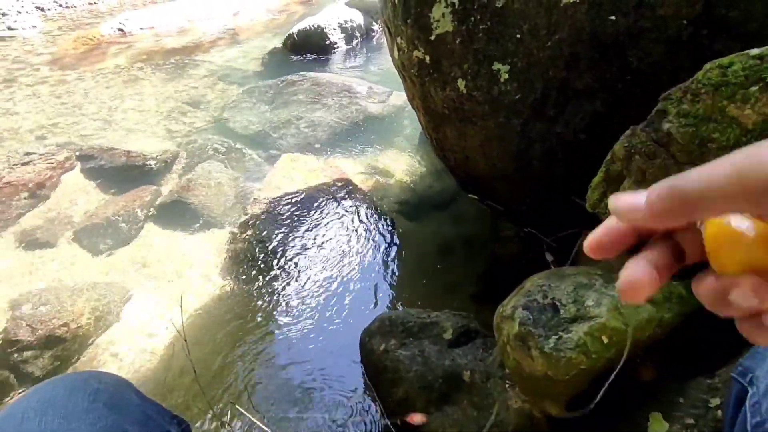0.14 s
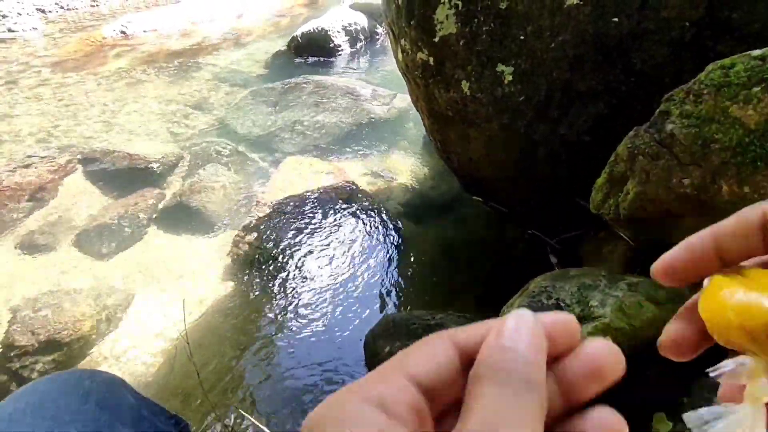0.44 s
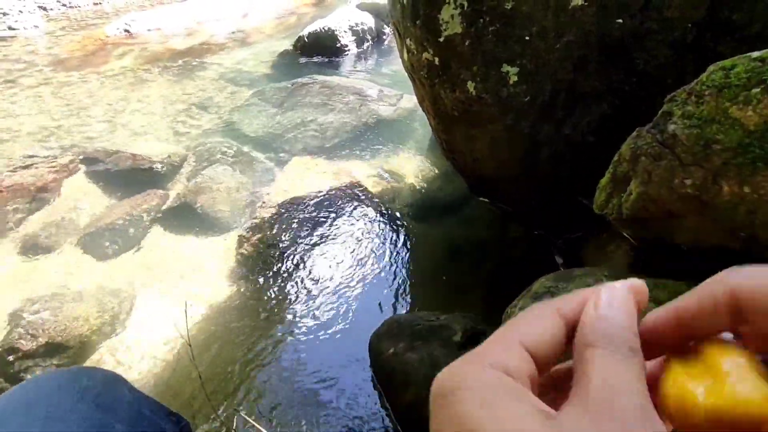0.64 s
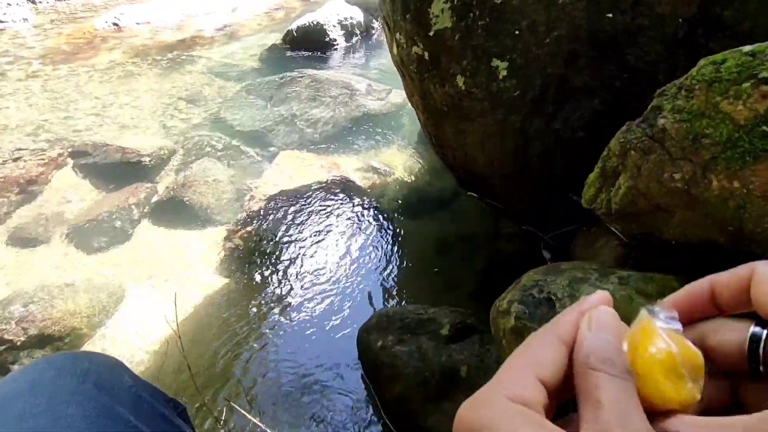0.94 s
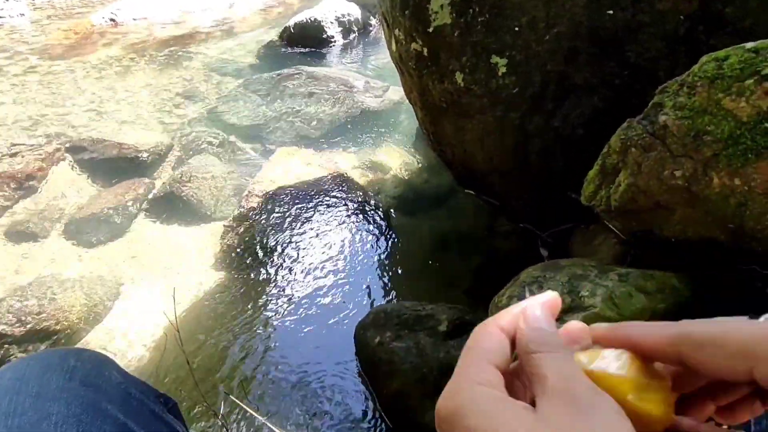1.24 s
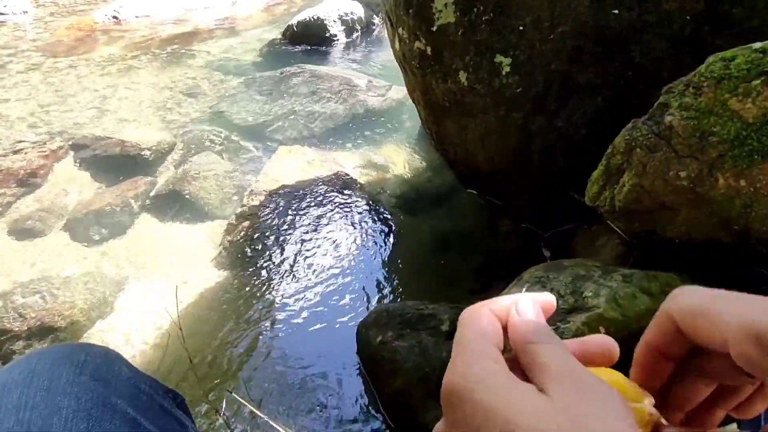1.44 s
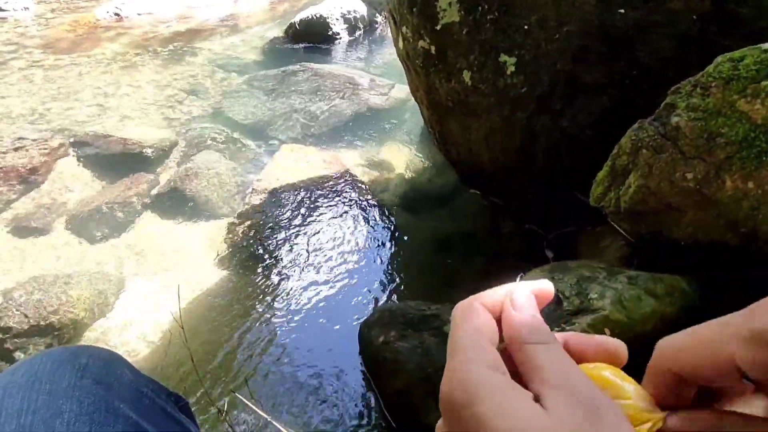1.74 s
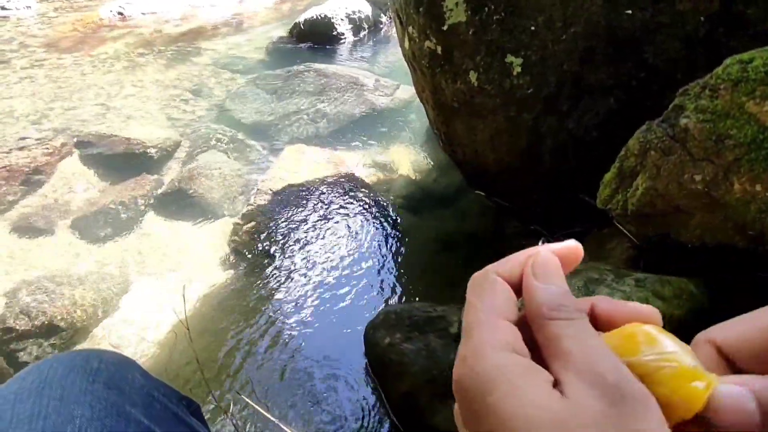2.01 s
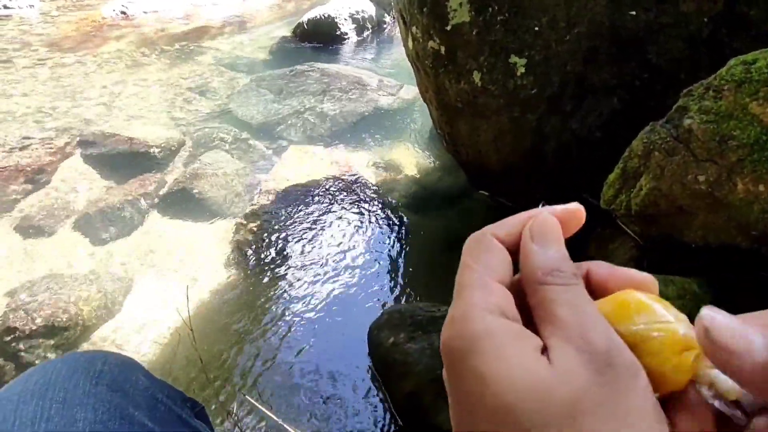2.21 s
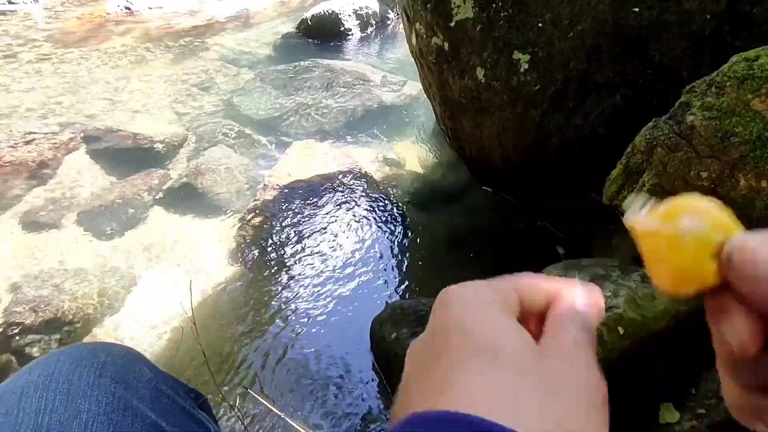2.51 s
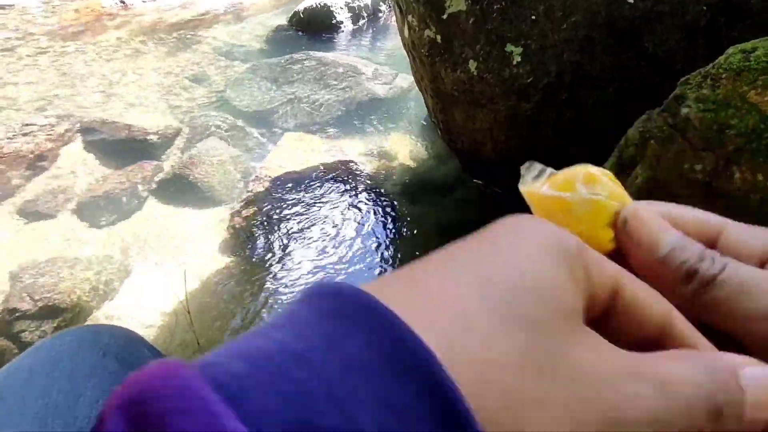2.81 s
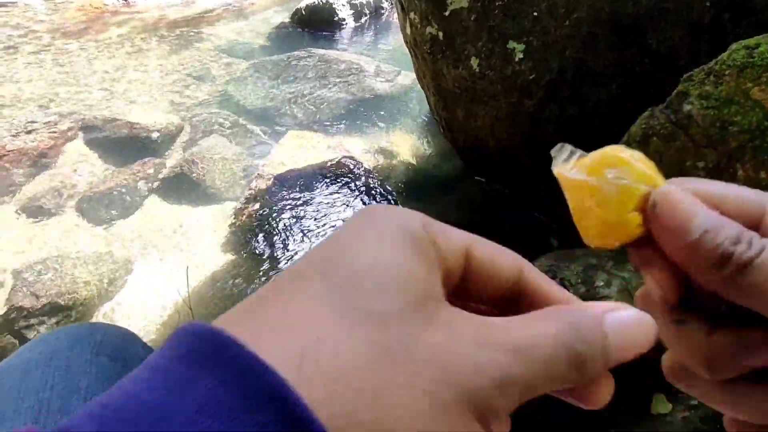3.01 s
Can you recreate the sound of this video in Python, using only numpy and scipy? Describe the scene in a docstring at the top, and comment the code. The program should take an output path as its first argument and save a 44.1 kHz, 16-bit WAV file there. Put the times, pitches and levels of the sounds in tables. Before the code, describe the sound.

Steady stream water burbling over rocks, with close, crisp crackles of a small plastic bag being handled.

```python
"""Stream and plastic bag

A shallow stream runs over stones, heard from the bank through two microphone ports, in two channels of
unequal colour. Its rush is patchy noise; its gurgle is a crowd of short rising tones, with some louder
single bubbles. Close by, fingers work a thin plastic bag: tiny creases rustle and larger folds snap.
The hand-held recorder is bumped softly twice (low thuds), and a thin high hiss swells late."""
import sys
import numpy as np
from scipy import signal
from scipy.fft import rfft, irfft, next_fast_len
from scipy.io import wavfile
from scipy.ndimage import uniform_filter1d, map_coordinates

SR = 44100
rng = np.random.default_rng(int(sys.argv[2]) if len(sys.argv) > 2 else 0)


def field_ratio(decibels):
    """Amplitude ratio for a level in dB (20 dB per decade); scalars and array-likes work."""
    return 10 ** (np.asarray(decibels, dtype=float) / 20)


def store_pcm(level_fs):
    """Save levels as 16-bit WAV."""
    pcm = np.round(np.clip(level_fs, -1, 1) * 32767).astype(np.int16)
    wavfile.write(sys.argv[1], SR, np.atleast_2d(pcm).T)


N = 138915  # length in samples

# How strongly the water flows: t/s, relative level/dB
WATER_FLOW = [(0.0, -26.5), (1.02, -25.5), (2.04, -26.5), (2.91, -26), (3.15, -26.5)]
# Colour of the rushing water: f/Hz, relative level per Hz/dB
RUSH_COLOUR = [(25.0, -16), (60.0, -4.5), (150.0, -2), (330.0, 0), (650.0, 3), (850.0, -1), (1080.0, -2.5),
               (1500.0, -0.5), (2250.0, -8), (2800.0, -11.5), (15700.0, -23.5)]
# How alike the water sounds at the two ports: f/Hz, likeness (0 to 1)
PORT_LIKENESS = [(40, .3), (90, .4), (170, .85), (330, .94), (500, .6), (700, .7), (950, .35), (1150, .68),
                 (1600, .33), (2250, .6), (2600, .3), (6000, .05)]
# Single louder bubbles: t/s, peak level at the ports/dB, f/Hz
SINGLE_BUBBLES = [(0.22, -13.5, 1580), (0.267, -19.5, 1800), (0.322, -18, 1236), (0.435, -13.5, 1430),
                  (0.92, -18, 410), (0.934, -13, 1184), (0.952, -15, 515), (1.004, -18, 1302),
                  (1.091, -23.5, 2100), (1.143, -26, 2650), (1.204, -19, 1157), (1.239, -21.5, 2310),
                  (1.332, -21, 2280), (2.008, -23.5, 2090), (2.069, -26, 2600), (2.246, -19, 340),
                  (2.301, -20.5, 308), (2.574, -21.5, 216), (2.583, -14, 704), (2.792, -15.5, 1330),
                  (2.885, -17, 300), (2.902, -16.5, 1470), (2.972, -19, 1660), (0.286, -15.5, 1010),
                  (.352, -15, 983), (.4, -20, 370), (.622, -19, 330), (.69, -19, 558), (2.655, -19, 584),
                  (2.78, -16.5, 545), (.257, -20.5, 377), (.57, -23, 550), (.668, -22, 404),
                  (.757, -18.5, 553), (.844, -23, 362), (1.205, -20, 537), (1.243, -22, 528),
                  (1.39, -26, 410), (1.485, -20, 630), (3.03, -16.5, 575)]
# Fingers on the bag: t/s, effort as relative level/dB
FINGER_EFFORT = [(0, -81), (.33, -76), (.39, -44.5), (.5, -80), (.54, -41), (.64, -49), (.75, -41),
                 (.86, -51.5), (.92, -35.5), (.97, -47), (1.1, -67), (1.3, -55), (1.44, -48), (1.56, -52),
                 (1.75, -47.5), (1.83, -43), (1.93, -43), (2.1, -50.5), (2.16, -45), (2.24, -35.5),
                 (2.3, -42.5), (2.39, -39.5), (2.5, -47.5), (2.62, -58), (2.66, -46), (2.75, -64),
                 (3.08, -86), (3.15, -45)]
# Snapping folds: t/s, relative snap level/dB, left minus right level/dB, relative level of lower body/dB
FOLD_SNAPS = [(0.3837, -25, 3, -25), (0.5374, -17, -1.0, -42), (0.552, -18, 7, -46), (0.621, -11, -11, -36),
              (0.7047, -15, 7, -31), (0.71, -8.5, 11, -30), (0.752, -13, 16, -38), (0.7712, -13, -3, -41),
              (0.795, -9.5, 13, -31), (0.8954, -26, 21, -45), (0.901, -20, 5, -40), (0.9095, -23, 4, -39),
              (0.9236, -5.5, -10, -47), (0.935, -10, -2, -35), (1.4378, -18, -13, -44), (1.68, -13, 6, -43),
              (1.7026, -14, -13, -35), (1.793, -24, -9, -37), (1.8168, -12, -7, -42), (1.8474, -9, 3, -39),
              (1.9102, -12, -7, -42), (1.9274, -9, -3, -37), (1.936, -9, 0, -44), (1.964, -22, 13, -36),
              (2.167, -14, 8, -39), (2.1787, -12.5, -7, -34), (2.2082, -9.5, 2, -24), (2.22, -17, -1, -30),
              (2.2287, -13, 11, -31), (2.25, -1, 4, -24), (2.341, -13, -8, -35), (2.386, -30, -2.0, -32),
              (2.4259, -13, 14, -24.5), (2.648, -7, -5, -47), (3.125, -13, 1, -43), (0.719, -21, -3, -42),
              (0.819, -20, 6, -40), (0.874, -20, -3, -43), (2.216, -10, -9, -38), (2.238, -5.5, 0, -35),
              (2.2425, -10, 9, -30), (2.435, -11.5, -1, -40), (2.451, -16, -4, -31),
              (2.468, -23, -4, -25.5)]
# Colour of the plastic as it reaches each port: f/Hz, left level/dB, right level/dB
FILM_COLOUR = [(500, -36, -36), (1500, -9, -25), (2870, -12, -28), (3730, -6, -2.5), (4170, 6, -25),
               (4300, 6.5, -5), (4740, -6.5, -5), (5740, -10.5, -13), (6970, -11, -9), (9230, 21.5, -11.5),
               (10570, 21.5, -9), (10000, 13, 4.5), (14400, -9, -18), (15400, -6, 3)]
# Colour of a fold's lower ring: f/Hz, level/dB
FOLD_BODY_COLOUR = [(600, -34), (1200, -7), (3000, 8.5), (3700, -22), (4100, 38), (4600, 1), (5500, -12),
                    (9000, -40)]
# Bumps on the recorder: t/s, peak level at the ports/dB, f/Hz
CASE_BUMPS = [(1.077, -20.5, 72.4), (2.83, -32, 41)]
# Thin high hiss, maybe insects: t/s, rms level at the ports/dB
SHRILL_LEVEL = [(2.2, -75), (2.7, -41), (3.15, -42)]
# Overall colour of each channel, with deep gaps near 4 kHz and, on the left, at 7-11 kHz:
# f/Hz, left level/dB, right level/dB
CHANNEL_COLOUR = [(330, -4, -3.5), (444, -4, -4.5), (650, -3.5, -4), (803, -7, -3.5), (1066, 1.5, -5),
                  (1576, -6.5, -5.5), (2340, -0.5, 1), (3567, -3, 0), (3650, 1.5, -14), (3940, -34, -46.5),
                  (4490, -45, -13.5), (4470, -4.5, -19.5), (4650, -16, -9), (5470, -1.5, -7.5),
                  (6210, 3.5, -3.5), (7320, 1.5, -0.5), (7100, -53, 1.5), (8520, -25.5, 7.5),
                  (9580, -51, 2), (10500, -37.5, -18.5), (11360, -24, -14), (13300, -19, -7.5),
                  (13340, -6, 0), (14260, -4, -1.5), (14700, -15, -7), (15500, -21, -20)]
# Phase between left and right by frequency, beyond the lags; positive puts the left ahead: f/Hz, phase/rad
CHANNEL_PHASE = [(100, 0), (400, .6), (700, 0), (900, .9), (1100, -.5), (1400, -1.1), (1600, .4),
                 (2400, -.5), (2800, .3)]

GURGLE_HZ, GURGLE_LOG_SPREAD = 1100, .55  # centre pitch, random spread of its natural log
GURGLE_DB = -7.5  # gurgle against the rush
# A bubble's timescale in cycles: it is loudest after a third of this and cut off after three times it
BUBBLE_CYCLES, BUMP_CYCLES = 8.04, 1.6
SINGLE_CYCLES, CYCLES_POWER = 12.5, 0.53  # timescale of a louder bubble at 1 kHz, its power law with pitch
PITCH_RISE = 0.1  # pitch gained over one timescale, as a share of the nominal pitch
GURGLE_SIZE_DB, RUSTLE_SIZE_DB = 3.5, 2.8  # scatter of grain sizes
BIGGEST = 3  # cap on a grain's size, in multiples of the scatter
WATER_LAG_S, BAG_LAG_S = 0.00043, .0001  # the left port hears later

CREASE_HZ, CREASE_LOG_SPREAD = 8000, .55  # centre pitch of the creases, random spread of its natural log
CREASE_RING = .65  # share of ringing tone in a crease; the rest is noise
RUSTLE_DB, SNAP_DB, BODY_DB = 22.5, 10, 13  # added to the levels in the bag's tables
CREASE_T60_S, SNAP_T60_S, BODY_T60_S = .004, .007, 0.019  # time to fade by 60 dB
SNAP_RISE_S = .0003  # time constant of a snap's start
SHRILL_HZ, SHRILL_WIDTH_HZ = 14200, 450
TOP_HZ = 15600  # upper limit of crease pitch and of both channels


def unit(x):
    """Scales to an rms of 1."""
    return x / np.sqrt(np.mean(x ** 2) + 1e-20)


def along(points, hz, column=1):
    """Reads a column of a frequency table on a log frequency axis."""
    table = np.transpose(points)
    return np.interp(np.log(hz + 1), np.log(table[0] + 1), table[column])


def curve(rows):
    """Draws straight lines through (time, value) rows, one value per sample."""
    return np.interp(np.arange(N) / SR, *np.transpose(rows))


def wobble(rate):
    """Draws a smooth random curve with `rate` random points a second."""
    points = rng.standard_normal(int(N * rate / SR) + 4)
    return map_coordinates(points, [np.arange(N) * rate / SR])


def filtered(x, response):
    """Multiplies the spectrum of x by a response, which may be complex."""
    size = next_fast_len(N + 8192)
    hz = np.fft.rfftfreq(size, 1 / SR)
    return irfft(rfft(x, size) * response(hz), size)[..., :N]


def lagged(pair, lag_s):
    """Makes the left channel arrive lag_s after the right, by opposite phase slopes."""
    return filtered(pair, lambda hz: np.exp(np.outer([-1j, 1j], np.pi * hz * lag_s)))


def spread(pair):
    """Mixes two unrelated signals so that the ports are as alike as the table says."""
    def mid_side_gains(hz):
        angle = np.arccos(np.clip(along(PORT_LIKENESS, hz), 0, 1)) / 2
        return np.array([np.cos(angle), np.sin(angle)])

    mid, side = filtered(pair, mid_side_gains)
    return np.array([mid + side, mid - side])


def place(start_s, grains):
    """Adds up short sounds, one per row, at their start times."""
    first = (np.asarray(start_s) * SR).astype(int)
    at = first[:, None] + np.arange(grains.shape[1])
    return np.bincount(at.ravel(), grains.ravel(), N + SR)[:N]


def grain_sizes(count, scatter_db):
    """Draws random sizes in dB: most are small, a few large, none above the cap."""
    return scatter_db * np.minimum(rng.exponential(size=count), BIGGEST)


def bubbles(start_s, db, hz, cycles, size):
    """Each bubble is a damped sine with a soft start and a rising pitch."""
    age = np.outer(hz, np.arange(size) / SR) / cycles  # in timescales
    envelope = np.e * 3 * age * np.exp(-3 * age)  # peaks at 1
    turns = cycles * (age * (1 - PITCH_RISE / 2) + PITCH_RISE * age * age / 2)
    tone = envelope * np.sin(2 * np.pi * turns)
    return place(start_s, field_ratio(db)[:, None] * tone * (age < 3))


def gurgle():
    """A random crowd of bubbles blends into a gurgle of rms 1."""
    count = 700
    pitch = GURGLE_HZ * np.exp(GURGLE_LOG_SPREAD * rng.standard_normal(count))
    pitch = np.clip(pitch, 150, 14000)
    start_s = rng.uniform(0, N / SR, count)
    return unit(bubbles(start_s, grain_sizes(count, GURGLE_SIZE_DB), pitch, BUBBLE_CYCLES, size=2000))


def rush():
    """Coloured noise whose level varies in random patches of time and frequency gives the even rush."""
    spectrum = signal.stft(rng.standard_normal((2, N)), nperseg=512)[2]
    patches = uniform_filter1d(rng.standard_normal(spectrum.shape[1:]), size=6, axis=0)  # over frequency
    patches = uniform_filter1d(patches, size=10, axis=1)  # over time
    patchy = spectrum * field_ratio(1.34 * unit(patches))
    noise = signal.istft(patchy, nperseg=512)[1][:, :N]
    return unit(filtered(noise, lambda hz: field_ratio(along(RUSH_COLOUR, hz))))


def stream():
    """Rush and gurgle follow the flow together; louder single bubbles stand out."""
    rushing = rush()
    gurgling = np.array([gurgle() for _ in range(2)])
    level = field_ratio(curve(WATER_FLOW) + 4.5 + 0.12 * wobble(2.34) + 0.087 * wobble(17))
    water = level * spread(rushing + field_ratio(GURGLE_DB) * gurgling)
    start_s, db, hz = np.transpose(SINGLE_BUBBLES)
    cycles = SINGLE_CYCLES * (hz[:, None] / 1000) ** CYCLES_POWER
    singles = bubbles(start_s, db, hz, cycles, size=4000)
    return lagged(water + singles, WATER_LAG_S)


def noise_bursts(db, t, t60):
    """Bursts of noise that start at once and die away evenly in dB."""
    return field_ratio(db[:, None] - 60 * t / t60) * rng.standard_normal((len(db), len(t)))


def rustle(t):
    """Many tiny creases, each part ringing tone and part noise, crackle under the fingers' effort."""
    count = 3000
    start_s = rng.uniform(0, N / SR, count)
    sizes = grain_sizes(count, RUSTLE_SIZE_DB)
    hz = np.minimum(CREASE_HZ * np.exp(CREASE_LOG_SPREAD * rng.standard_normal((count, 1))), TOP_HZ)
    ports = []
    for _ in range(2):  # same creases at both ports, but fresh phases and noise
        fade = field_ratio(sizes[:, None] - 60 * t / CREASE_T60_S)
        ring = fade * np.sin(2 * np.pi * (hz * t + rng.random(hz.shape)))
        ticks = CREASE_RING * ring + (1 - CREASE_RING) * noise_bursts(sizes, t, CREASE_T60_S)
        ports.append(unit(place(start_s, ticks)))
    return np.array(ports) * field_ratio(curve(FINGER_EFFORT) + RUSTLE_DB)


def bag():
    """Creases rustle and larger folds snap, coloured by the film; each snap also has a lower body."""
    t = np.arange(600) / SR
    rustling = rustle(t)
    start_s, db, pan_db, body_db = np.transpose(FOLD_SNAPS)
    rise = 1 - np.exp(-t / SNAP_RISE_S)
    snaps = np.array([place(start_s, rise * noise_bursts(db + SNAP_DB + side * pan_db / 2, t, SNAP_T60_S))
                      for side in (1, -1)])  # left, right
    body = place(start_s, noise_bursts(body_db + BODY_DB, t, BODY_T60_S))
    body = filtered(body, lambda hz: field_ratio(along(FOLD_BODY_COLOUR, hz)))
    film = lambda hz: field_ratio([along(FILM_COLOUR, hz, column=c) for c in (1, 2)])
    return lagged(filtered(rustling + snaps, film) + body, BAG_LAG_S)


def bumps():
    """Knocks reach both ports through the case as short low thuds, shaped like very brief bubbles."""
    start_s, db, hz = np.transpose(CASE_BUMPS)
    return bubbles(start_s, db, hz, BUMP_CYCLES, size=8000)


def shrill():
    """A narrow band of noise, unrelated at the two ports, makes a thin far hiss."""
    band = lambda hz: np.exp(-((hz - SHRILL_HZ) / SHRILL_WIDTH_HZ) ** 2)
    hiss = unit(filtered(rng.standard_normal((2, N)), band))
    return field_ratio(curve(SHRILL_LEVEL)) * hiss


def scene():
    """Adds up all the sounds arriving at the two ports."""
    return stream() + bag() + bumps() + shrill()


def band_limit(x):
    """A steep low-pass at the top of the band."""
    return signal.sosfilt(signal.butter(12, 15800, fs=SR, output="sos"), x)


def record(dry):
    """Each channel gets its own overall colour, their phases differ a little, and the top is cut off."""
    def channel_response(hz):
        phase = np.exp(np.outer([.5j, -.5j], along(CHANNEL_PHASE, hz)))  # half to each channel
        colour = field_ratio([along(CHANNEL_COLOUR, hz, column=c) for c in (1, 2)])
        return (hz < TOP_HZ) * phase * colour

    mix = filtered(dry, channel_response)
    return band_limit(mix)


dry = scene()
out = record(dry)
store_pcm(out)
```